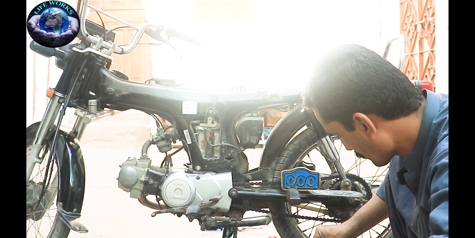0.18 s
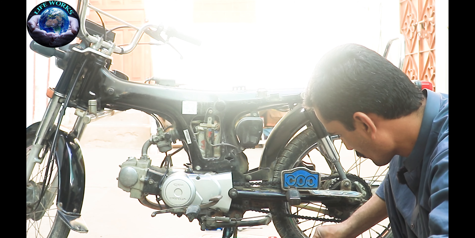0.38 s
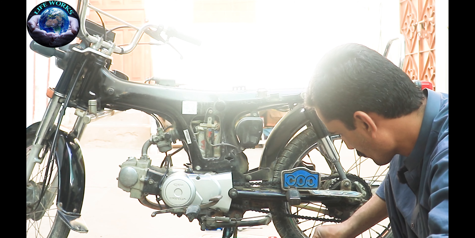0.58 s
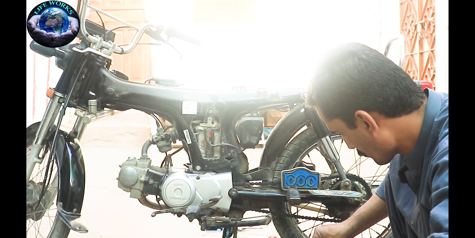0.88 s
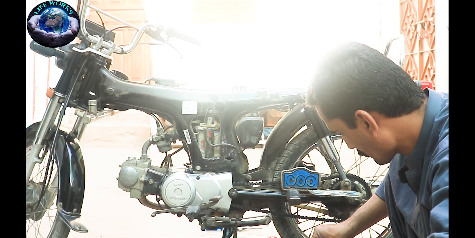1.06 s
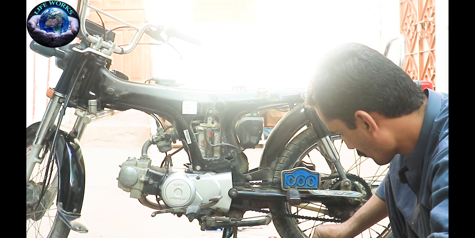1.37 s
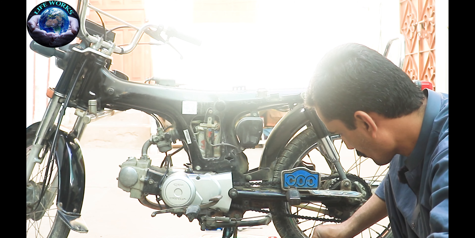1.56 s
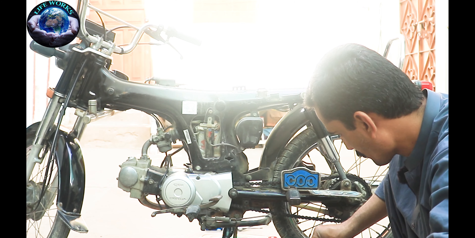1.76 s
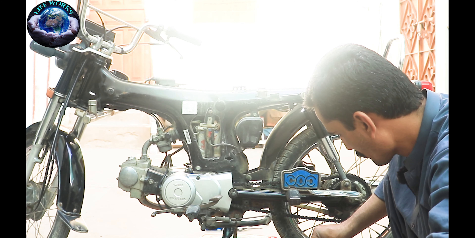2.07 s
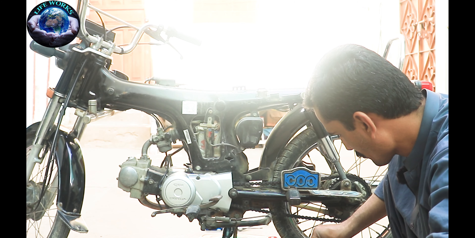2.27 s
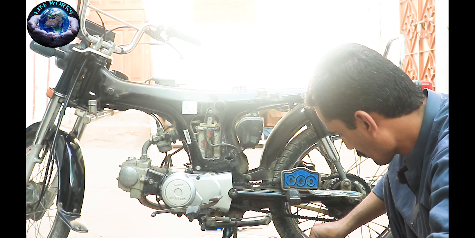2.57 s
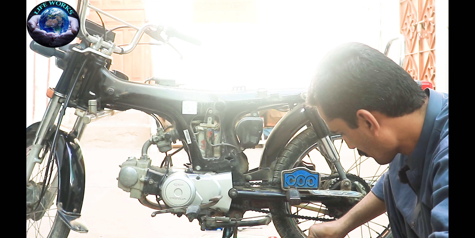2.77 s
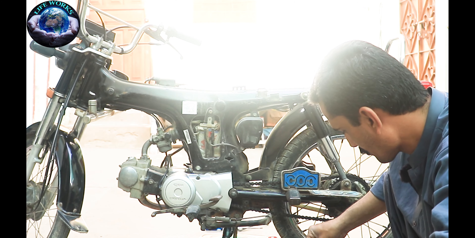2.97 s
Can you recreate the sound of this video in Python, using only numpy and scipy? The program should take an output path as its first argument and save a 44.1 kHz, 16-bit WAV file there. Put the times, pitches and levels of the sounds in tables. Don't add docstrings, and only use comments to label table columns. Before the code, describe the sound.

Loud sharp metallic clacks in uneven bursts as balls fall into a metal tank, with faint clinks, rustling and short scrapes between; brief hard-walled outdoor reflections, very close distorted microphone.

```python
import sys
import numpy as np
from scipy import signal
from scipy.fft import rfft, irfft
from scipy.io import wavfile
from scipy.ndimage import uniform_filter1d

SR = 44100
rng = np.random.default_rng(int(sys.argv[2]) if len(sys.argv) > 2 else 0)


def amp(db):
    return 10 ** (np.asarray(db, float) / 20)


def write(x):
    x = np.atleast_2d(x).T
    wavfile.write(sys.argv[1], SR, np.round(np.clip(x, -1, 1) * 32767).astype(np.int16))


N = 138915


def unit_rms(x):
    return x / np.sqrt(np.mean(x ** 2) + 1e-20)


def read(points, hz):
    f, value = np.transpose(points)
    return np.interp(np.log(hz + 1), np.log(f + 1), value)


def add(mix, start_s, sound):
    part = mix[round(start_s * SR):][:len(sound)]
    part += sound[:len(part)]


def coloured(x, colour):
    hz = np.fft.rfftfreq(len(x), 1 / SR)
    return irfft(rfft(x) * amp(read(colour, hz)), len(x))


def above(x, cut_hz):
    return signal.sosfilt(signal.butter(4, cut_hz, "high", fs=SR, output="sos"), x)


def noise_band(a, b, hz, width_hz):
    r = np.exp(-np.pi * width_hz / SR)
    once = signal.lfilter([1], [1, -r], a + 1j * b)
    band = signal.lfilter([1], [1, -r], once)
    return unit_rms((band * np.exp(2j * np.pi * np.cumsum(hz) / SR)).real)


def rings(hz, db, t60_s):
    pole = (2j * np.pi * hz - np.log(1000) / np.maximum(t60_s, .01)) / SR
    coarse = np.exp(np.outer(pole, np.arange(0, 8192, 128))) * amp(db)[:, None]
    fine = np.exp(np.outer(pole, np.arange(128)))
    tones = coarse.astype(np.complex64)[:, :, None] * fine.astype(np.complex64)[:, None]
    return tones.reshape(len(hz), -1)


# (frequency [Hz], t60 [s])
WALL_T60 = [(500, 0.14), (1300, 0.087), (3500, 0.085), (9000, 0.048), (15000, 0.012)]


def blows(events, colour, strong, extra, dense_db, count):
    most_cycles, scatter_db, thud_hz = 250, 2, 1544
    rise_s, lift_db = .0006, -6
    hz = np.linspace(350, 16500, count) + rng.uniform(-5.0, 10.5, count)
    t60_s = read(WALL_T60, hz) * rng.uniform(.8, 1.25, count)
    modes = np.vstack([np.c_[hz, read(colour, hz) + dense_db, t60_s], strong + extra])
    hz, rows = modes[:, 0], np.array(events)
    modes[count:, 2] = np.minimum(modes[count:, 2], most_cycles / hz[count:])
    low = np.arange(len(hz)) >= len(hz) - len(extra) if extra else hz < thud_hz

    draw = rng.standard_normal((len(events), len(hz), 3))
    phase = np.angle(draw[..., 0] + 1j * draw[..., 1])
    share = np.exp(1j * phase) * amp(scatter_db * draw[..., 2] + np.outer(rows[:, 2], low))
    if rows.shape[1] > 3:
        share = share * amp(np.outer(rows[:, 3], np.log2(hz / 4000)))
    sounds = (share.astype(np.complex64) @ rings(*modes.T)).real

    t, out = np.arange(sounds.shape[1]) / SR, np.zeros(N)
    envelope = (1 - np.exp(-t / rise_s)) * np.cos(np.pi / 2 * (t / t[-1]) ** 4)
    for row, sound in zip(rows, sounds):
        add(out, row[0], amp(row[1] + lift_db) * envelope * sound / np.std(sound[:200]))
    return out


def glides(table, width, halo_db):
    grit_db, halo_width = -0.5, 0.5
    out = np.zeros(N)
    for start_s, length_s, from_hz, to_hz, db in table:
        u = np.arange(0, length_s, 1 / SR) / length_s
        a, b, c, d, grit = rng.standard_normal((5, 8000))[:, :len(u)]
        hz = from_hz + (to_hz - from_hz) * u
        core = noise_band(a, b, hz, width * to_hz)
        halo = amp(halo_db) * noise_band(c, d, hz * 1.1, halo_width * to_hz)
        level = amp(db + grit_db * unit_rms(uniform_filter1d(grit, size=150)))
        add(out, start_s, level * np.sqrt(np.sin(np.pi * u)) * (core + halo))
    return out


# (frequency [Hz], level [dB])
AIR = [(300, -67), (600, -36), (2250, -36), (2500, -4), (3600, -5), (4500, -12), (9000, -11), (16000, -28)]


def air():
    hiss_db, rumble_hz, rumble_db, lump_db = -66, 145, -77, 5
    a, b, c, *slow = rng.standard_normal((5, N))
    drift, lumps = (unit_rms(uniform_filter1d(uniform_filter1d(v, size=2500), size=2500)) for v in slow)
    rumble = noise_band(a, b, rumble_hz * (1 + 0.18 * drift), 73) * amp(rumble_db + lump_db * lumps)
    return amp(hiss_db) * unit_rms(coloured(c, AIR)), above(rumble, 95)


# (time [s], level [dB])
SHUFFLE = [(0, -36), (.06, -40.5), (.2, -44), (0.42, -51.5), (.66, -40.5), (.73, -41), (.85, -49.5),
           (1.1, -41.5), (1.16, -46), (1.22, -45.5), (1.46, -48), (1.52, -42.5), (1.64, -43.5), (1.69, -47),
           (2.03, -43), (2.2, -41.5), (2.7, -49), (2.97, -82)]
# (frequency [Hz], level [dB])
GRAIN = [(420, -52), (580, -14), (1400, -8), (2150, -12), (3000, -1.5), (4000, -2.5), (6500, -6.5),
         (16000, -33)]


def shuffle():
    contacts_per_s, hum_hz, hum_width_hz, hum_waver, hum_db = 1500, 732, 45, .02, -10
    sizes = amp(2 * np.minimum(rng.exponential(1, N), 4))
    grains = sizes * (rng.random(N) < contacts_per_s / SR) * rng.standard_normal(N)
    decay = np.exp(-np.arange(600) / 100.0)
    dying = np.sqrt(abs(signal.oaconvolve(grains ** 2, decay)[:N]))
    rustle = unit_rms(coloured(dying * rng.standard_normal(N), GRAIN))
    waver = hum_waver * unit_rms(uniform_filter1d(rng.standard_normal(N), size=2500))
    hum = noise_band(grains, 0 * grains, hum_hz * (1 + waver), hum_width_hz)
    level_db = np.interp(np.arange(N) / SR, *np.transpose(SHUFFLE))
    return amp(level_db) * (rustle + amp(hum_db) * hum)


# (time [s], peak level [dB], neck hum [dB], brightness [dB/octave])
CLINKS = [(0.0, -20, -5.5, -4), (.02, -34, -18, 0), (.087, -34, -12, 0), (.109, -30, -8, 5),
          (.127, -36, -12, 4), (0.0583, -19.5, 16, 6.5), (0.178, -25.5, -16, 8), (0.3272, -21.5, -14, -2),
          (0.3764, -30.5, -9, -0.5), (0.6943, -50, -8, -2), (0.7144, -26.5, -2, 1),
          (0.7407, -24, -0.5, -0.5), (1.0814, -25, -28, -3), (1.1533, -29, -13, -1), (1.22, -36, -6, 2),
          (1.51, -22, -8.5, 0), (1.5399, -25.5, -4, 0), (1.57, -36, -13, 0), (1.6028, -42, 4, 5),
          (1.6202, -25.5, -8, 1.5), (1.6444, -29.5, -24, 0), (1.692, -35.5, -15, 7), (1.708, -32, -7, -5),
          (1.975, -23.5, -11, 5), (2.024, -20, -18, -0.5), (2.032, -27, -12, -0.5), (2.0755, -19, -6, -1),
          (2.186, -21.5, 1.5, 0.5), (2.455, -25, -8, 7), (2.5, -21, -5, 4), (2.544, -20.5, -17, -3)]
# (frequency [Hz], level [dB])
NECK = [(180, -33), (300, -51), (749, -21.5), (946, -24), (1580, -16), (1690, -24), (1970, -21.5),
        (11100, -12.5), (16000, -24.5)]
# (frequency [Hz], level [dB], t60 [s])
NECK_RING = [(3290, -20, 0.015), (4750, -18, 0.015), (5450, -19, 0.018), (6400, -21, .015)]
# (frequency [Hz], level [dB], t60 [s])
NECK_HUM = [(600, -28.5, 0.1), (723, -33.5, 0.13), (739, -27, 0.081), (1007, -30, 0.098)]


def clinks():
    return blows(CLINKS, NECK, NECK_RING, NECK_HUM, dense_db=-28, count=700)


# (start [s], length [s], start frequency [Hz], end frequency [Hz], level [dB])
ROLLS = [(0.099, 0.044, 7290, 6550, -32.5), (2.68, 0.066, 3970, 3880, -43.5),
         (2.67, 0.062, 6480, 6570, -35.5), (2.95, 0.08, 3800, 3700, -39.5), (3.018, 0.071, 5800, 5300, -35),
         (3.025, 0.043, 5800, 5500, -36), (3.04, 0.061, 5000, 4500, -32.5),
         (3.02, 0.074, 3700, 3500, -37.5), (3.095, 0.094, 6900, 7190, -34.5),
         (3.09, 0.079, 4500, 4300, -40), (3.1, 0.088, 3700, 3100, -40.5)]


def rolls():
    floor_hz = 2500
    return above(above(glides(ROLLS, width=0.15, halo_db=-1), floor_hz), floor_hz)


# (time [s], peak level [dB], boom [dB])
KNOCKS = [
    (0.2144, -6.5, 1.5),
    (0.2613, -8, -1),
]
# (frequency [Hz], level [dB], t60 [s])
KNOCK_BOOM = [(371, -23, 0.5), (463, -27, 0.4), (572, -21, 0.25), (657, -22, 0.3), (738, -19, 0.15),
              (750, -10, 0.25), (1430, -14, .1), (1570, -12, .1), (2390, -15, .14)]


def knocks():
    return blows(KNOCKS, NECK, NECK_RING, KNOCK_BOOM, dense_db=-4.5, count=700)


# (time [s], peak level [dB], dull thud [dB])
TANK_HITS = [(0.466, 6, 5.5), (0.8714, -0.5, 2.5), (0.9408, 2, 3.5), (1.2431, -0.5, 2), (1.7142, 6, 4),
             (1.8544, 5, 5.5), (2.0987, 0, 1), (2.218, -0.5, 2), (2.3947, 0, 0.5), (2.5494, -1, -1),
             (2.6024, -0.5, 0.5), (2.7478, -0.5, 0.5), (2.812, -1, 2.5),
             (0.4854, 0, 2), (0.5201, 0.5, 6), (0.5492, -0.5, 3.5), (0.8939, -1, 5.5), (0.9614, -3.5, 6.5),
            (1.2738, 2, 1.5), (1.2804, -5.5, 1), (1.3113, 0.5, 2.5), (1.3477, -0.5, 6), (1.3664, -3.5, -1),
            (1.7838, -0.5, 0), (1.7988, 0, 3), (1.8477, 1, 4), (1.8996, -0.5, 5), (2.2495, -2, 2),
            (2.2674, 0, 3), (2.3326, 0, 2), (2.4062, -1.5, 6), (2.8442, -0.5, 1), (2.13, -21, -5),
            (2.296, -13, 6), (2.301, -2, 3.5)]
# (frequency [Hz], level [dB])
WALL = [(180, -59), (300, -61), (502, -25.5), (1840, -10.5), (2480, -14.5), (3190, -7), (6100, -1.5),
        (10600, -2.5), (16000, -4)]
# (frequency [Hz], level [dB], t60 [s])
TANK = [(563, -12, 0.073), (743.7, -24, 0.15), (1178.5, -7, 0.057), (1451, -13.5, .1), (1816, -12, 0.082),
        (3181, -2.5, 0.072), (3726, -2, 0.07), (4206, -1.5, .06), (4548, 0, 0.081), (5470, -4.5, 0.023),
        (6045, 7, 0.12), (6280, 3, 0.12), (6880, -1, 0.066), (7663, 8.5, 0.027)]


def tank_blows():
    return blows(TANK_HITS, WALL, TANK, [], dense_db=-12.0, count=2000)


# (start [s], length [s], start frequency [Hz], end frequency [Hz], level [dB])
SQUEAKS = [(.75, 0.022, 3480, 2920, -43), (.785, 0.012, 3350, 4170, -41), (.797, 0.038, 3850, 2740, -37.5),
           (.848, 0.035, 2800, 3010, -40), (.772, 0.048, 2230, 2130, -48), (1.445, 0.019, 2505, 2500, -36),
           (1.468, 0.055, 4010, 3300, -36.5), (1.498, 0.041, 3250, 2520, -32),
           (1.525, 0.0427, 2956, 3206, -31), (1.565, 0.11, 3090, 3100, -44.5),
           (2.865, 0.053, 4500, 3960, -31.5), (2.885, 0.064, 3840, 3457, -28.5),
           (3.075, 0.042, 1350, 1300, -65), (3.11, .03, 1750, 1650, -62), (3.11, .05, 600, 610, -68)]


def squeaks():
    return glides(SQUEAKS, width=.075, halo_db=-8.5)


# (frequency [Hz], t60 [s])
YARD = [(500, 0.23), (1300, 0.29), (3500, 0.31), (9000, 0.27), (15000, 0.22)]


def yard(x):
    gap_s, turns_hz = .006, 9
    slots, out = np.arange(round(gap_s * SR), SR // 2 - 20, 12), np.zeros(N)
    for k in range(3):
        taps = np.zeros(SR // 2)
        at = slots + rng.integers(0, 12, len(slots))
        taps[at] = rng.choice([-1., 1.], len(slots))
        hz, t, z = signal.stft(taps, SR, nperseg=256)
        fade = amp(-60 * t / np.maximum(read(YARD, hz), .03)[:, None])
        tail = signal.istft(z * fade, SR, nperseg=256)[1]
        turn = np.sqrt(2 / 3) * np.cos(2 * np.pi * (np.arange(N) / SR * turns_hz + k / 3))
        out += signal.fftconvolve(x * turn, tail / np.linalg.norm(tail))[:N]
    return out


LOW_LEAK = .03


def scene():
    hiss, rumble = air()
    dry = shuffle() + clinks() + rolls() + knocks() + tank_blows() + squeaks()
    yard_db = -7.5
    return (dry + amp(yard_db) * yard(dry) + hiss + rumble / LOW_LEAK)[None]


def top_cut(x):
    return signal.sosfilt(signal.butter(12, 16380, fs=SR, output="sos"), x)


def record(dry):
    low_cut_hz, ceiling, overload_bass_db, edge_hz = 466, .99, -2, 15980
    thin = above(above(dry, low_cut_hz), 0.61 * low_cut_hz)
    clean = (1 - LOW_LEAK) * thin + LOW_LEAK * dry
    shaved = clean - np.clip(clean, -ceiling, ceiling)
    flat = clean - coloured(shaved[0], [(300, overload_bass_db), (600, 0)])[None]
    band_limit = signal.firwin(127, edge_hz, window=("kaiser", 6), fs=SR)
    return top_cut(signal.oaconvolve(flat, band_limit[None], "same"))


dry = scene()
out = record(dry)
write(out)
```